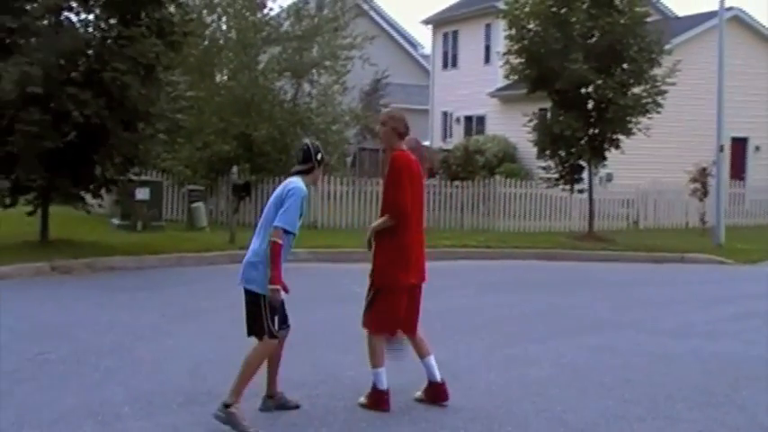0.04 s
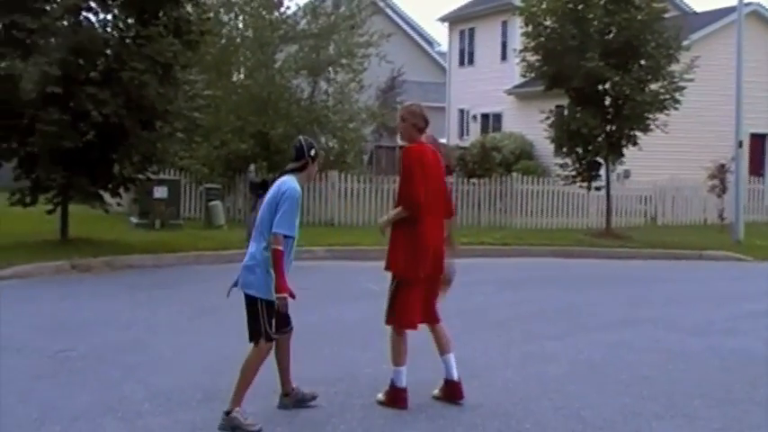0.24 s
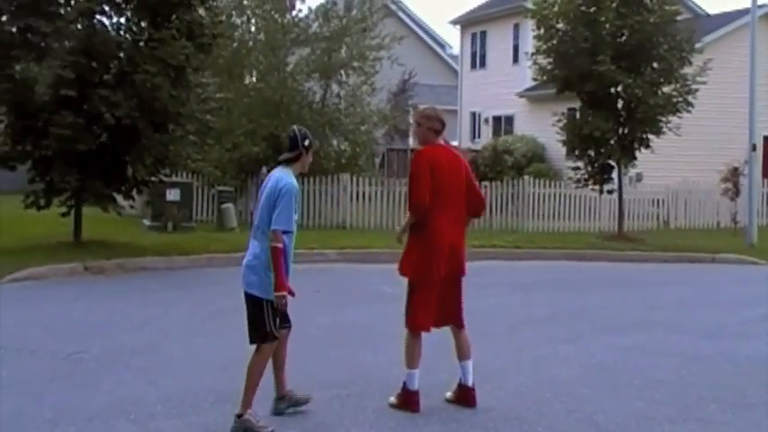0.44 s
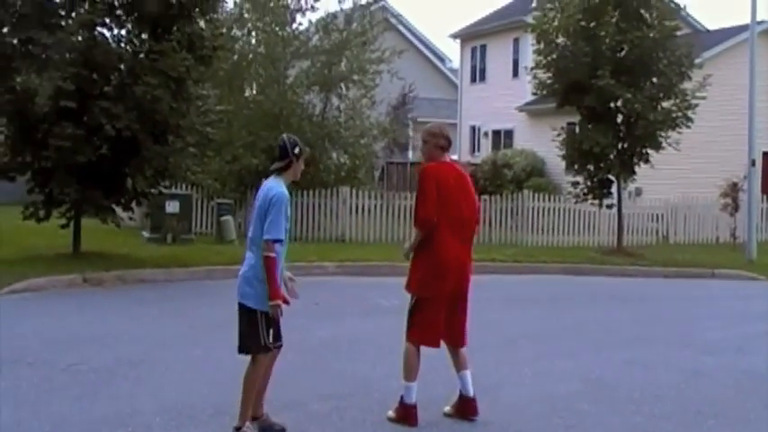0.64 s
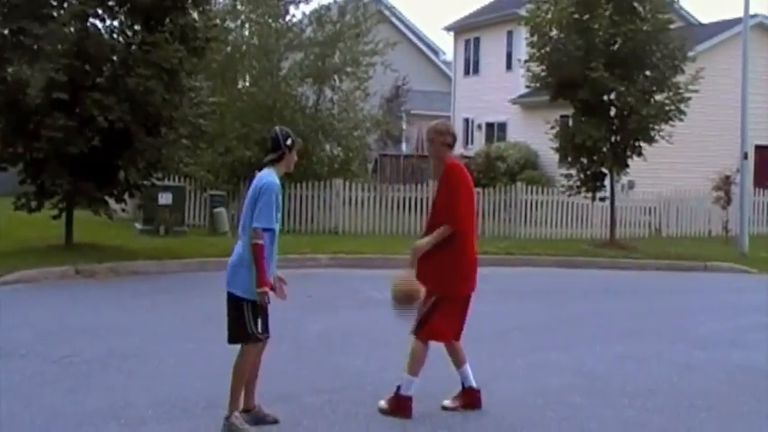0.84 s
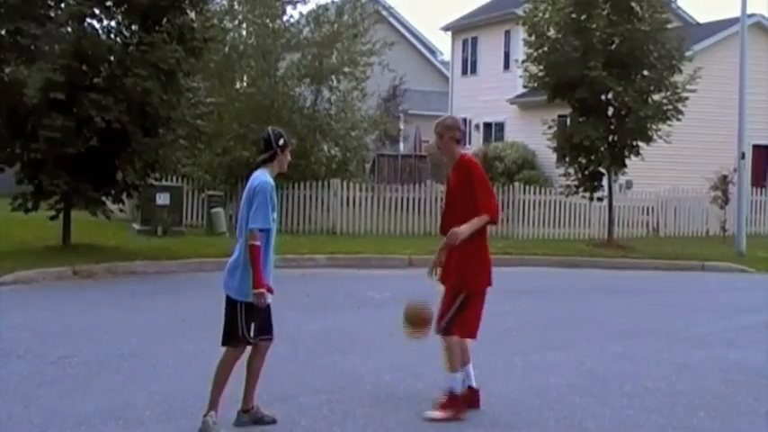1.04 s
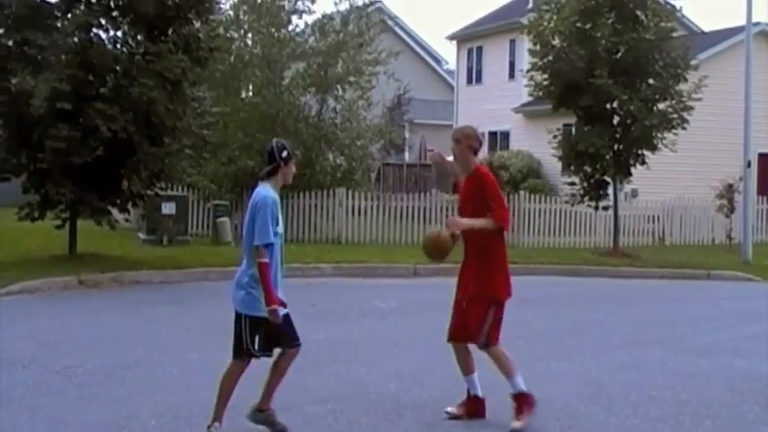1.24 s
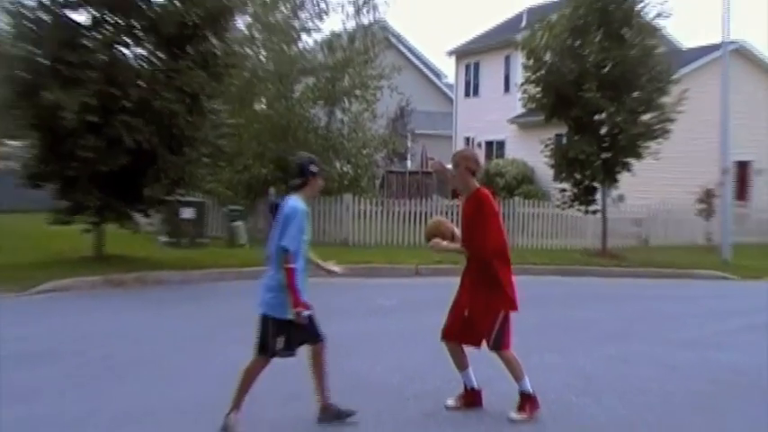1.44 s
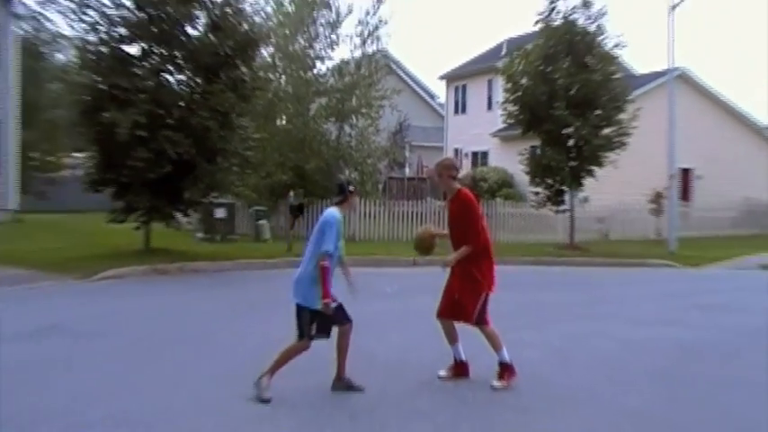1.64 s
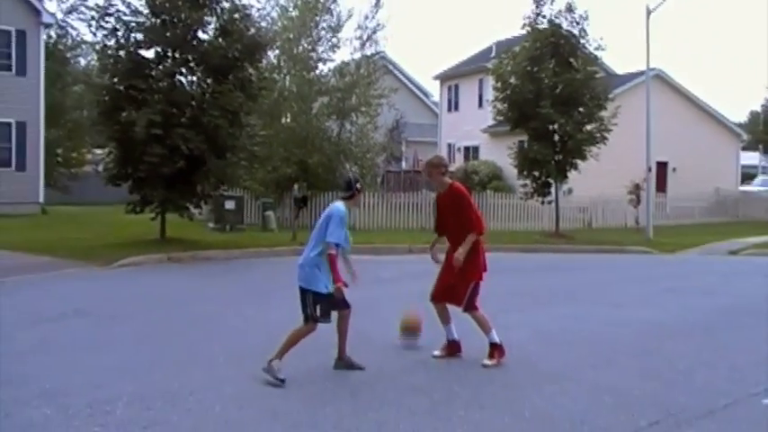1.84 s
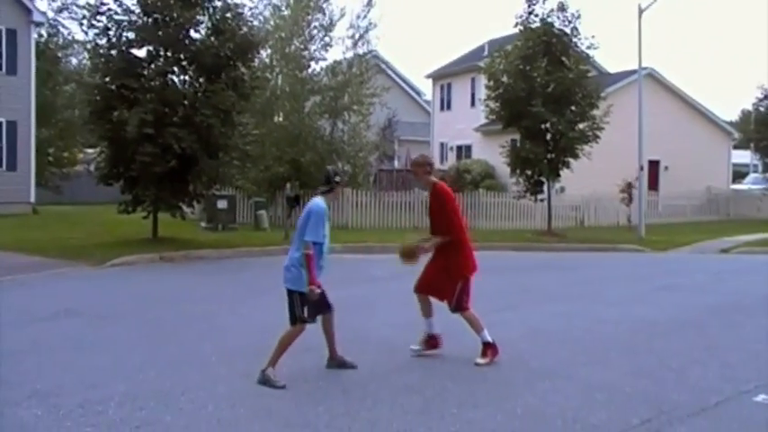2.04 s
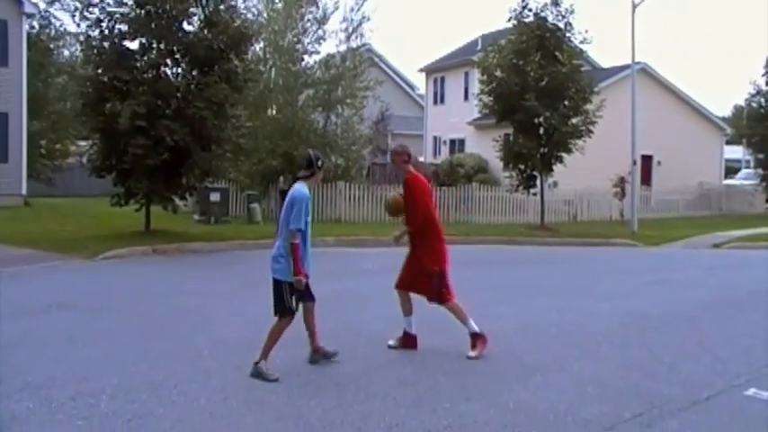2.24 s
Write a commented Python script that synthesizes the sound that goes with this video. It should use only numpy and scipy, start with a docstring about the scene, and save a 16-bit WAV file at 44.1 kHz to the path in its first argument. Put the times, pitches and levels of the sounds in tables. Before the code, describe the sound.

A basketball bounces three times on asphalt, about a second apart, each sharp thump ringing briefly and echoing off houses. Faint shoe scuffs and hand pats fall in between, over a quiet street's low rumble and hum.

```python
"""A basketball is dribbled on the asphalt of a quiet street, over low rumble, faint hiss and hum.
A shoe scuffs on grit and the ball lands at 0.23 s: it thumps as it flattens, the rubber slaps hard
enough to overload the microphone, shell and inner air ring briefly, then house fronts throw it back.
Another scuff and hand pats lead to the second bounce at 1.09 s. Taps and scuffs follow,
then the third bounce at 2.00 s and a last few taps near 2.3 s."""
import sys
import numpy as np
from scipy import signal
from scipy.fft import rfft, irfft
from scipy.io import wavfile
from scipy.ndimage import uniform_filter1d

SR = 44100
rng = np.random.default_rng(int(sys.argv[2]) if len(sys.argv) > 2 else 0)


def dump(signal):
    """Clip the signal to [-1, 1] and save it as 16-bit WAV at the path in sys.argv[1]."""
    limited = np.clip(np.atleast_2d(signal).T, -1, 1)
    pcm = np.round(limited * 32767).astype(np.int16)
    wavfile.write(sys.argv[1], SR, pcm)


N = 105840


# Bounces: t/s, thump/dB, slap/dB, treble/dB, ping f/Hz, ping/dB, shell f/Hz, shell/dB,
# inner air/dB, nearest echo/dB
BOUNCE_HITS = [(0.2287, -2.5, 0, 0, 2426, -3.5, 1315, -20, -5.5, -1.5),
               (1.0859, -2.5, 0, -5, 2074, -10, 852, -6.5, 2, 3),
               (1.9959, -2.5, -0.5, 0.5, 3040, -6.5, 1114, -6, -2.5, 0.5)]
def dribble():
    """The ball lands on a new spot each time, so each bounce has its own ring and echoes."""
    treble_hz, left_bias_db, ring_spill = 6500, 0.54, 0.27
    out, t = np.zeros((2, N)), np.arange(SR // 4) / SR
    for s, thump_db, slap_db, treble_db, *ring_settings, nearest_db in BOUNCE_HITS:
        thumps, slaps, rings = np.zeros((3, 2, N))
        add(thumps, s, amp(thump_db) * thump(t))
        add(slaps, s, amp(slap_db) * slap(t))
        add(rings, s, ring(t, *ring_settings))
        soft = signal.lfilter(*signal.butter(1, treble_hz, fs=SR), slaps)
        near = (soft + amp(treble_db) * (slaps - soft)) * amp([[left_bias_db], [-left_bias_db]])
        spill = slaps + ring_spill * rings  # reaches the houses
        out += thumps + rings + near + echoes(thumps, spill, nearest_db) + street_tail(thumps + spill)
    return out


def thump(t):
    """The ball flattens fast and springs back: little more than one low cycle."""
    hz, decay_s, squash_turns, squash_s = 122.2, 0.0088, 0.25, 0.001
    turns = hz * t + squash_turns * (1 - np.exp(-t / squash_s))
    return -np.sin(2 * np.pi * turns) * np.exp(-(t / decay_s) ** 2.8)


# Rubber on asphalt, spectrum: f/Hz, relative level/dB
SLAP_SPECTRUM = [(100, -19.5), (300, -11), (550, -16), (900, -1.5), (1250, -1.5), (1650, -4), (2300, 0),
                 (3400, -8.5), (4100, -9.5), (4700, -16.5), (6300, -19), (9500, -20), (12000, -38.5),
                 (16000, -37)]
def slap(t):
    """Rubber hits grit, then gives a duller flutter as it lifts off."""
    hold_s, decay_s = 0.0012, 0.0012
    lift_s, lift_decay_s, lift_cutoff_hz = 0.008, 0.005, 1020
    envelope = np.exp(-np.maximum(t - hold_s, 0) / decay_s)
    mid = burst(envelope, passes=5)
    side = amp(-12.5) * signal.lfilter(*signal.butter(1, 1500, "high", fs=SR), burst(envelope))
    out = np.array([mid + side, np.roll(mid - side, shift=1)])  # left ear first
    flutter = signal.lfilter(*signal.butter(2, lift_cutoff_hz, fs=SR), burst(np.exp(-t / lift_decay_s)))
    add(out, lift_s, amp(-2.5) * flutter)
    return amp(-4) * np.linalg.norm(envelope) * colour(out, SLAP_SPECTRUM)


# Air modes inside the ball: f/Hz, relative level/dB, T60/s
CAVITY_MODES = [(395.7, -20, 0.087), (1010, -21, 0.09), (1390, -21, 0.044), (2170, -30, 0.035),
                (2985, -27, 0.029), (4000, -20.5, 0.031)]
def ring(t, ping_hz, ping_db, shell_hz, shell_db, cavity_db):
    """Contact pings; the shell swings up and dies quickly; the air inside rings on a little."""
    ping_t60_s, shell_t60_s, shell_rise_s = 0.012, 0.035, 0.00088
    ping = amp(ping_db - 60 * t / ping_t60_s) * np.sin(2 * np.pi * ping_hz * t)
    swing = (1 - np.exp(-t / shell_rise_s)) * amp(shell_db - 60 * t / shell_t60_s)
    shell = swing * np.sin(2 * np.pi * shell_hz * t)
    cavity = sum(amp(db - 60 * t / t60) * np.sin(2 * np.pi * hz * t) for hz, db, t60 in CAVITY_MODES)
    return shell - ping - amp(cavity_db) * cavity


# Wall reflections: delay/s, slap/dB, thump/dB, centre f/Hz, spread/s
WALL_ECHOES = [(.0349, -3, -25, 1850, 0.0004), (.044, -12, -30, 1430, .003), (.075, -16, -26, 2900, .009),
               (.1032, -12.5, -16.5, 1400, 0.0042), (.124, -20, -16.5, 1400, .005)]
def echoes(thumps, spill, nearest_db):
    """House fronts return distinct echoes; the nearest changes with where the ball lands."""
    width = 0.6
    out, t = np.zeros((2, N)), np.arange(SR // 20) / SR
    for k, (delay_s, slap_db, thump_db, hz, spread_s) in enumerate(WALL_ECHOES):
        envelope = np.exp(-t / spread_s)
        wall = burst(envelope, passes=6) + width * np.array([burst(envelope), burst(envelope)])
        scattered = signal.fftconvolve(band(spill, hz, q=5.8), wall, axes=1)[:, :N]
        add(out, delay_s, amp(slap_db + nearest_db * (k == 0)) * scattered + amp(thump_db) * thumps)
    return out


# Tail spectrum: f/Hz, relative level/dB
TAIL_SPECTRUM = [(60, 7.5), (140, -17.5), (300, -1.5), (600, 8), (1300, -0.5), (2500, -1.5), (5000, 5),
                 (9000, 2.5), (13000, -2.5)]
# Tail decay: f/Hz, T60/s
TAIL_DECAY = [(100, 1), (500, 0.82), (1500, 1), (4000, 0.96), (10000, 0.71)]
# Tail stereo image: f/Hz, left-right correlation
TAIL_CORRELATION = [(150, .98), (600, .9), (1500, 0.66), (4000, 0.13), (9000, 0.13)]
def street_tail(x):
    """Trees and fences scatter the bounce into a diffuse tail."""
    gain_db, rise_s = -11, 0.021
    hz, t, (a, b) = signal.stft(rng.standard_normal((2, SR)), SR, nperseg=256)
    hz = hz[:, None]
    level_db = read(TAIL_SPECTRUM, hz) - 60 * t / read(TAIL_DECAY, hz)
    spectra = stereo(a, b, read(TAIL_CORRELATION, hz)) * amp(level_db)
    rise = 1 - np.exp(-np.arange(SR) / SR / rise_s)
    tail = signal.istft(spectra, SR, nperseg=256)[1][:, :SR] * rise
    return amp(gain_db) * signal.fftconvolve(x, tail / np.linalg.norm(tail[0]), axes=1)[:, :N]


# Hand pats and shoe taps: t/s, level/dB, centre f/Hz, Q, decay/s
TAP_HITS = [(1.0061, -23.5, 4000, 3.6, 0.0011), (1.0214, -27.5, 4000, 4.1, .0008),
            (1.269, -31.5, 890, 2.7, 0.0069), (1.5852, -25.5, 4970, 2.1, 0.0021),
            (1.631, -30.5, 910, 2.5, 0.0045), (2.2558, -31, 900, 0.57, 0.0047),
            (2.3102, -23.5, 704, 3.6, 0.0034), (2.312, -35.5, 4600, 3.5, 0.0021)]
def taps():
    """Palms meet the ball and soles meet the ground: short damped knocks."""
    out, t = np.zeros((2, N)), np.arange(SR // 10) / SR
    for s, db, hz, q, decay_s in TAP_HITS:
        envelope = np.exp(-t / decay_s)
        contact = burst(envelope) + 0.22 * np.array([burst(envelope), burst(envelope)])
        knock = band(band(contact, hz, q / 2), hz, q / 2)
        add(out, s, amp(db) * knock * np.linalg.norm(envelope) / np.linalg.norm(knock[0]))
    return out


# Shoe slides: centre t/s, grit/dB, Gaussian sigma/s, scrape/dB
SHOE_SLIDES = [(0.21, -44.5, 0.063, -44.5), (0.686, -44.5, 0.03, -43.5), (1.269, -37.5, 0.0072, -33),
               (1.581, -38.5, 0.014, -49), (2.265, -36.5, 0.0082, -38)]
# Soles on grit, spectrum: f/Hz, relative level/dB
GRIT_SPECTRUM = [(300, -22), (1500, -11), (4200, 2.5), (7000, -10), (10000, -4.5), (12000, -19),
                 (14000, -34)]
def scuffs():
    """Soles slide over grit: a grainy hiss above a duller scrape."""
    scrape_hz, scrape_q, grain_db = 1020, 0.55, 5.5
    hiss = stereo(*rng.standard_normal((2, N)), correlation=0.62)
    grains = amp(grain_db * np.minimum(rng.exponential(1, N), 4))
    grit = unit(colour(hiss * grains, GRIT_SPECTRUM))
    friction = stereo(*rng.standard_normal((2, N)), correlation=1.0)
    scrape = unit(band(band(friction, scrape_hz, scrape_q), scrape_hz, scrape_q))
    t = np.arange(N) / SR
    return sum(np.exp(-0.5 * ((t - s) / sigma_s) ** 2) * (amp(grit_db) * grit + amp(scrape_db) * scrape)
               for s, grit_db, sigma_s, scrape_db in SHOE_SLIDES)


# Outdoor noise spectrum: f/Hz, relative density/dB
OUTDOOR_SPECTRUM = [(15, -7), (45, 1), (75, -3), (125, -2), (190, -7.5), (300, -13.5), (600, -19.5),
                    (1200, -22.5), (2500, -27), (5000, -34), (9000, -37), (10800, -40), (11700, -52),
                    (12500, -80)]
# Outdoor stereo image: f/Hz, left-right correlation
OUTDOOR_CORRELATION = [(30, 0.84), (130, 0.97), (500, 0.89), (1500, 0.54), (4000, 0.15), (9000, 0.17)]
def outdoor_noise():
    """Distant rumble and soft hiss drift in patches."""
    rms_db = -33.5
    hz = np.fft.rfftfreq(2048, 1 / SR)[:, None]
    a, b, c, d, drift = rng.standard_normal((N // 512 + 5, len(hz), 5)).T
    patches_db = unit(uniform_filter1d(uniform_filter1d(drift, size=20, axis=0), size=10, axis=1))
    spectra = stereo(a + 1j * b, c + 1j * d, read(OUTDOOR_CORRELATION, hz))
    spectra *= amp(read(OUTDOOR_SPECTRUM, hz) + patches_db)
    return amp(rms_db) * unit(signal.istft(spectra, nperseg=2048, noverlap=1536)[1][:, :N])


def hum():
    """A faint hum wavers, like a distant air conditioner."""
    hz, rms_db, waver = 117.1, -41, 0.51
    t = np.arange(N) / SR
    drift = sum(np.exp(2j * np.pi * (rng.uniform(-6, 5.89) * t + rng.random())) for _ in range(12))
    tone = (1 + waver * drift / np.sqrt(12)) * np.exp(2j * np.pi * hz * t)
    return amp(rms_db) * unit(tone.real)


def amp(db):
    """Decibels to gain."""
    return 10 ** (np.asarray(db) / 20)


def unit(x):
    """Scales to rms 1."""
    return x / np.sqrt(np.mean(x ** 2) + 1e-20)


def read(points, hz):
    """Interpolates a table over log frequency."""
    f, value = np.transpose(points)
    return np.interp(np.log(hz + 1), np.log(f + 1), value)


def add(mix, s, sound):
    """Mixes a sound in at time s."""
    part = mix[:, round(s * SR):][:, :sound.shape[-1]]
    part += sound[..., :part.shape[1]]


def colour(x, points, size=2048):
    """Minimum-phase filter of unit energy with the given spectrum."""
    log_gain = np.log(amp(read(points, abs(np.fft.fftfreq(size, 1 / SR)))))
    fir = np.fft.ifft(np.exp(np.conj(signal.hilbert(log_gain)))).real[:size // 2]
    return signal.fftconvolve(x, fir[None] / np.linalg.norm(fir), axes=1)[:, :x.shape[1]]


def band(x, hz, q):
    """One resonance of peak gain 1."""
    return signal.lfilter(*signal.iirpeak(hz, max(q, hz / SR * 4), SR), x)


def stereo(a, b, correlation):
    """Two independent noises to a correlated left-right pair."""
    return np.array([a, correlation * a + np.sqrt(1 - correlation ** 2) * b])


def burst(envelope, passes=2):
    """Unit-energy crackle under the envelope; each pass fills spectral holes."""
    x = rng.standard_normal(len(envelope)) * envelope
    for _ in range(passes):
        spectrum = rfft(x)
        x = irfft(spectrum / (abs(spectrum) + 1e-12), len(envelope)) * np.sqrt(envelope)
    return x / np.linalg.norm(x)


def scene():
    """Ball, hands and shoes, background."""
    return dribble() + taps() + scuffs() + outdoor_noise() + hum()


# Microphone treble response: f/Hz, gain/dB
MIC_RESPONSE = [(8000, 0), (11000, -2), (12500, -7), (16000, -17)]
def record(dry):
    """The slaps overload the microphone, which dulls the top octave and limits the band."""
    ceiling, cutoff_hz = 0.94, 16600
    clipped = dry / (1 + (dry / ceiling) ** 8) ** (1 / 8)
    hz = np.linspace(0, SR / 2, 129)
    rolloff = signal.firwin2(63, hz, amp(read(MIC_RESPONSE, hz)), fs=SR)
    lowpass = signal.firwin(255, cutoff_hz, window=("kaiser", 9), fs=SR)
    dull = signal.oaconvolve(clipped, rolloff[None], "same")
    return signal.oaconvolve(dull, lowpass[None], "same")


dry = scene()
out = record(dry)
dump(out)
```